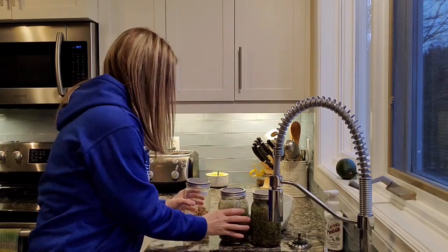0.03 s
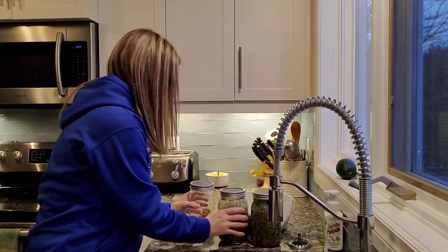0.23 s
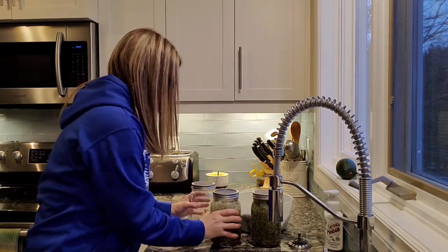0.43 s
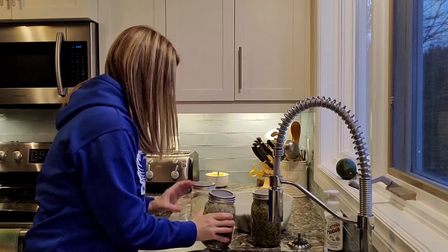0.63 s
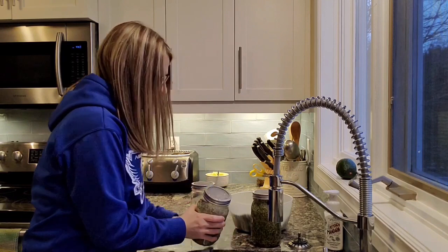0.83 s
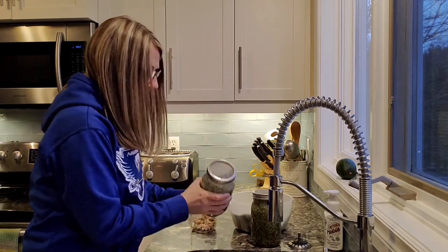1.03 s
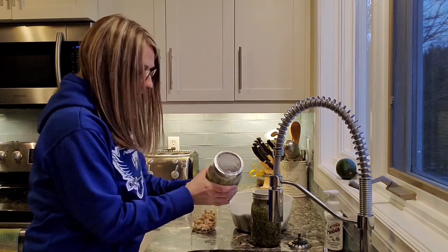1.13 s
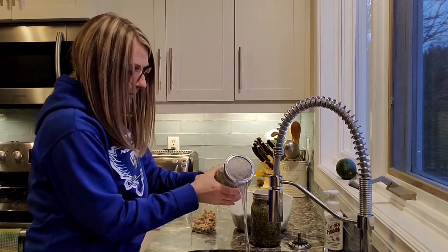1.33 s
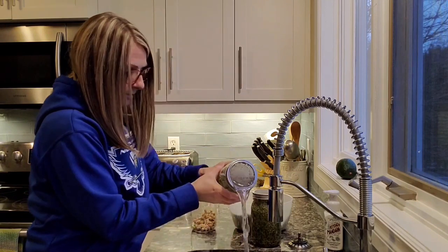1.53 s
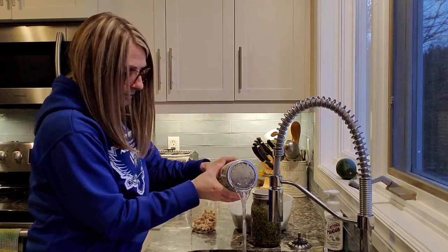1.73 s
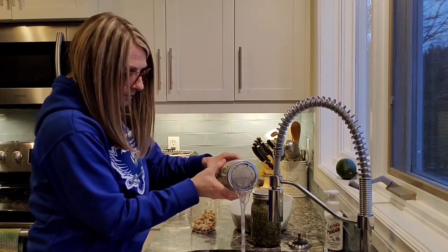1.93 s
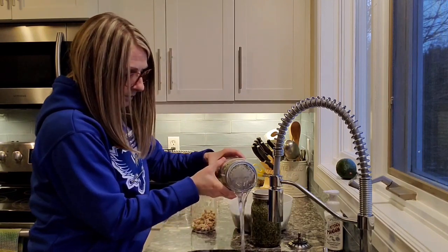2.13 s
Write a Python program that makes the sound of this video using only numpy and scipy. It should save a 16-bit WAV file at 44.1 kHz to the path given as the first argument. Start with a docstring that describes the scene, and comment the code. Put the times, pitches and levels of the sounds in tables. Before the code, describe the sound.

Water drains from a jar into a steel sink after two glass knocks on a counter.

```python
"""A hard-walled kitchen, ringing around every sound, over a low appliance hum.
A glass jar of water is bumped twice on the counter and rocks each time: clacks, a wooden-sounding boom
and ringing glass. It lifts with a small tick. Tipped over a steel sink, it fizzes faintly and drains
through its mesh lid: the stream drums the basin, patters, sprays and splashes, and one drip pings."""
import sys
import numpy as np
from scipy import signal
from scipy.fft import rfft, irfft
from scipy.io import wavfile

SR = 44100
rng = np.random.default_rng(int(sys.argv[2]) if len(sys.argv) > 2 else 0)


def materialize(psi):
    """Save the field psi as 16-bit PCM at rate SR to the path in sys.argv[1].

    A 1-D psi becomes a single channel; in a 2-D psi each row is a channel.
    """
    bounded = np.clip(np.atleast_2d(psi).T, -1, 1)
    quanta = np.round(bounded * 32767).astype(np.int16)
    wavfile.write(sys.argv[1], SR, quanta)


N = 97020


def undb(db):
    return 10 ** (np.asarray(db) / 20)


def clock():
    return np.arange(N) / SR


def unit_rms(x):
    return x / np.sqrt(np.mean(x ** 2))


def unit_energy(x):
    return x / np.sqrt(np.sum(x ** 2, axis=-1, keepdims=True))


def decay(t60):
    """Envelope that falls 60 dB in t60 seconds."""
    return np.exp(-np.minimum(np.log(1000) * clock() / t60, 40))


def convolve(x, y):
    return signal.fftconvolve(np.atleast_2d(x), np.atleast_2d(y), axes=-1)[:, :N]


def cue(start_s, x):
    return np.pad(np.atleast_2d(x), ((0, 0), (int(start_s * SR), 0)))[:, :N]


def pan(x, left_db):
    return x * undb(np.array([[1], [-1]]) * left_db / 2)


def filt(x, hz, kind, order=2):
    sos = signal.butter(order, np.minimum(hz, SR / 2 - 1), kind, fs=SR, output="sos")
    return signal.sosfilt(sos, x + 1e-18)


def eq(x, curve, size=4096):
    """Minimum-phase EQ through (f/Hz, level/dB) points."""
    hz, db = np.array(curve).T
    bin_hz = np.arange(size // 2 + 1) * SR / size
    gain = undb(np.interp(np.log(bin_hz + 1), np.log(hz), db))
    cepstrum = irfft(np.log(gain))
    cepstrum[1:size // 2] *= 2
    cepstrum[size // 2 + 1:] = 0
    return convolve(x, irfft(np.exp(rfft(cepstrum))))


def stereo_noise(wide_hz=660):
    """Diffuse noise: the bass is alike in both ears, the treble unrelated."""
    mid, side = rfft(rng.standard_normal((2, N)))
    hz = np.arange(len(mid)) * SR / N
    alike = 1 / (1 + (hz / wide_hz) ** 2) ** 2
    spread = np.array([[1], [-1]]) * side * np.sqrt((1 - alike) / 2)
    return irfft(mid * np.sqrt((1 + alike) / 2) + spread, N)


def ring(modes):
    """Ring of a struck object; neighbouring modes swing in opposite directions."""
    return sum((-1) ** k * undb(db) * np.sin(2 * np.pi * hz * clock()) * decay(t60)
               for k, (hz, db, t60) in enumerate(modes))


def impacts(per_s, scatter_db):
    """Random clicks of uneven size: the grain of drops and scuffs."""
    hits = rng.random(N) < per_s / SR
    size = undb(scatter_db * np.clip(rng.standard_normal(N), -2, 2))
    return unit_rms(hits * size * rng.choice([-1, 1], N))


def reverb(x, room, wet_db):
    return x + undb(wet_db) * convolve(x, room)


def kitchen_response(bass_t60=0.62, treble_t60=0.35, damp_hz=5040, lowest_hz=62.5, bands=9):
    """Close reflections from cupboards, and a tail whose treble dies first."""
    spectrum, tail = rfft(stereo_noise()), 0
    bin_hz = np.arange(spectrum.shape[1]) * SR / N
    octave = np.clip(np.log2((bin_hz + 1) / lowest_hz), 0, bands - 1)
    for k in range(bands):
        hz = lowest_hz * 2 ** k
        t60 = treble_t60 + (bass_t60 - treble_t60) / (1 + (hz / damp_hz) ** 2)
        band = irfft(spectrum * np.maximum(1 - abs(octave - k), 0), N)
        tail = tail + band * decay(t60)
    attack = 1 - np.exp(-clock() / 0.0019)
    early = stereo_noise() * decay(t60=0.11)
    return unit_energy(tail * attack) + undb(-0.5) * unit_energy(early * attack)


# Tone of the kitchen air: f/Hz, level/dB
AIR_EQ = [(20, -9), (45, -12), (70, 0), (130, 3.5), (210, -8), (280, 2), (400, -9.5), (520, -3.5),
          (750, -15), (1500, -23), (2800, -33), (4200, -31), (9000, -39), (14000, -47.5)]
def room_tone():
    """A steady, dark bed of air noise."""
    return undb(-52) * unit_rms(eq(stereo_noise(), AIR_EQ))


def appliance_hum(hz=58.2, hold_s=0.4, fade_db_per_s=9):
    """A low hum that holds briefly, then fades away."""
    t = clock()
    level_db = -52 - fade_db_per_s * np.maximum(t - hold_s, 0)
    return undb(level_db) * unit_rms(np.sin(2 * np.pi * hz * t))


def drip(room, start_s=1.988, hz=2860):
    """One drip pings in the basin as its bubble rings."""
    ping = np.sin(2 * np.pi * hz * clock()) * decay(t60=0.12)
    return undb(-57) * reverb(cue(start_s, ping), room, wet_db=2.5)


LANDING_S = 1.4852  # the water first hits the steel
# Force of the stream on the basin: t/s, level/dB
STREAM_FORCE = [(1.485, 0), (1.53, 1), (1.6, -3), (1.655, 0), (1.74, 0), (1.80, -9.5), (1.875, -10.5),
                (1.91, -1.5), (1.995, -7.5), (2.03, -13), (2.12, -21.5), (2.2, -10)]
def flow():
    """The surging pour: one envelope drives spray, patter and drumming."""
    t = clock()
    return undb(np.interp(t, *np.array(STREAM_FORCE).T)) * (t > LANDING_S)


def landing_ramp(attack_s):
    return np.clip((clock() - LANDING_S) / attack_s, 0, 1)


# Sizzle of fine droplets: f/Hz, level/dB
SPRAY_EQ = [(700, -17), (1500, -8.5), (2400, -6), (4000, -3), (6300, -2), (8500, 0), (12000, 1), (14500, 1)]
def spray(room):
    """The stream throws bright droplets, which surge less than the flow does."""
    droplets = flow() ** 0.62 * landing_ramp(attack_s=0.01) * impacts(per_s=1500, scatter_db=0.5)
    return undb(-57) * reverb(eq(droplets, SPRAY_EQ), room, wet_db=7.5)


def lid_fizz(room, peak_s=1.2, width_s=0.11):
    """A faint fizz, bright as the spray, swells and fades at the mesh lid as the jar tips."""
    swell = np.exp(-((clock() - peak_s) / width_s) ** 2)
    fizz = eq(swell * impacts(per_s=3000, scatter_db=8), SPRAY_EQ)
    return undb(-74.5) * reverb(fizz, room, wet_db=4)


# Dull tap of a landing drop: f/Hz, level/dB
PATTER_EQ = [(40, -24), (90, -1.5), (250, 1), (450, -3), (750, -14.5), (1200, -19), (2200, -25),
             (5000, -36.5)]
def patter(room):
    """A crowd of soft taps gives the stream its body."""
    tap = unit_energy(eq(signal.unit_impulse(N), PATTER_EQ))
    taps = convolve(flow() * impacts(per_s=900, scatter_db=4.5), tap)
    return undb(-54.5) * reverb(taps, room, wet_db=7.5)


# Modes of the steel basin: f/Hz, level/dB, t60/s
BASIN_MODES = [(81.4, -19, 0.13), (187.1, -4.5, 0.19), (204.2, -9.5, 0.15), (250.3, -7, 0.17),
               (292.6, 0, 0.26), (359, -18.5, 0.43), (405.5, -17.5, .18), (478, -20.5, 0.2),
               (591, -23.5, 0.23)]
def basin_drum(room):
    """The stream lands with a soft thump, then its drops keep the steel drumming."""
    steel = ring(BASIN_MODES)
    thump = cue(LANDING_S, filt(steel, 425, "low"))
    drops = flow() * landing_ramp(attack_s=0.052) * impacts(per_s=800, scatter_db=4)
    drumming = convolve(drops, unit_energy(steel))
    return reverb(undb(-24.5) * thump + undb(-34.5) * drumming, room, wet_db=-15)


# Splashes in the sink: t/s, level/dB, centre f/Hz, decay time/s
SPLASH_CUES = [(1.4844, -20, 7100, 0.0035), (1.489, -13, 1130, 0.0046), (1.509, -6.5, 6300, 0.0092),
               (1.523, -15, 1370, .006), (1.529, -11.5, 6760, .02), (1.61, -10, 12600, 0.0099),
               (1.698, -4.5, 12300, 0.04), (1.72, -1.5, 7600, 0.013), (1.7223, -0.5, 6220, 0.0047),
               (1.742, -5.5, 6960, .02), (1.757, -14, 6400, 0.0091), (1.907, -11, 9800, .008),
               (1.952, -25, 11000, .015), (1.958, -11.5, 10500, 0.0078), (1.9946, -10, 6000, .007),
               (2.1253, -17, 8500, .01)]
def splashes(room, attack_s=0.0011, relative_width=0.19):
    """Gushes burst into clusters of tiny bubbles, with a broad crackle on top."""
    t, mix = clock(), 0
    for start_s, db, hz, decay_s in SPLASH_CUES:
        envelope = np.exp(-t / decay_s) * (1 - np.exp(-t / attack_s))
        burst = impacts(per_s=5000, scatter_db=-2) * envelope
        edges_hz = hz * np.exp(np.array([-1, 1]) * relative_width / 2)
        bubbles = unit_energy(filt(burst, edges_hz, "band", order=1))
        crackle = unit_energy(filt(burst, 5700, "high"))
        mix = mix + undb(db) * cue(start_s, bubbles + undb(-6) * crackle)
    return undb(-14) * reverb(mix, room, wet_db=-1)


# Tone of glass scuffing the counter: f/Hz, level/dB
TICK_EQ = [(500, -6.5), (1400, 3.5), (2400, -4.5), (3100, -8), (4100, -2), (5800, -19), (7500, -5),
           (12000, -1), (14500, -5.5)]
def jar_tick(room, start_s=0.878):
    """A short bright scuff as the jar leaves the counter."""
    scuff = unit_energy(impacts(per_s=6000, scatter_db=3.5) * decay(t60=0.043))
    return undb(-23.5) * reverb(eq(cue(start_s, scuff), TICK_EQ), room, wet_db=6)


# Hits of the rocking jar: t/s, clack level/dB, clack cutoff f/Hz, boom level/dB, glass level/dB
KNOCK_CUES = [(0.2409, -1, 2130, -11.5, -2.5), (0.252, -4, 2000, -2.5, 4.5), (0.288, -8.5, 1000, -2.5, -5),
              (.304, -6.5, 1970, -6.5, -14), (0.4149, -4, 1730, -9, -12), (0.421, -7, 1740, -2, 2),
              (0.4292, -7.5, 1100, -8.5, -16), (.4505, -6.5, 700, 1, -8)]
# Tone of the jar clacking on the counter: f/Hz, level/dB
CLACK_EQ = [(40, -14.5), (100, -3.5), (220, -3), (400, 3.5), (750, 0), (1400, 0), (2100, -0.5), (3100, -9),
            (4500, -5), (5800, -17), (8000, 3), (10000, -11), (13000, 5.5)]
# Modes of the counter and cabinet: f/Hz, level/dB, t60/s
COUNTER_MODES = [(97.4, -19.5, 0.35), (185.5, -13.5, .25), (369.4, 1.5, 0.18), (457.1, 5, .21),
                 (483, -7.5, 0.21), (600, -19, .35), (618, -18, 0.23), (679, -7.5, 0.29), (805, -13.5, 0.4),
                 (918, -17, 0.26), (1044, -23.5, 0.21), (1179, -15, 0.29), (1362, -10, 0.13),
                 (1544, -13.5, 0.21), (2010, -17, 0.16)]
# Modes of the glass jar: f/Hz, level/dB, t60/s
GLASS_MODES = [(2273, -3, 0.33), (2430, -4, .3), (2834, -8.5, 0.52), (4300, -6, .15), (4394, -1.5, 0.2),
               (4460, -1, .2), (4570, -7.5, 0.18), (4710, -9.5, .16), (7000, -18, .25), (7800, -10, 0.18),
               (12950, -19, .22)]
def jar_knocks(room, thud_hz=2090):
    """Each contact thuds and chatters, sets the counter booming and rings the glass."""
    clack, boom, glass = 0, 0, 0
    counter_ring, glass_ring = ring(COUNTER_MODES), ring(GLASS_MODES)
    for start_s, clack_db, cutoff_hz, boom_db, glass_db in KNOCK_CUES:
        hit = unit_energy(rng.standard_normal(N) * decay(t60=0.008))
        thud = filt(hit, thud_hz, "low", order=4)
        chatter = filt(unit_energy(stereo_noise() * decay(t60=0.077)), 130, "high")
        contact = undb(2) * thud + undb(-0.5) * chatter
        clack = clack + undb(clack_db) * cue(start_s, filt(contact, cutoff_hz, "low"))
        boom = boom + undb(boom_db) * cue(start_s, counter_ring)
        glass = glass + undb(glass_db) * cue(start_s, glass_ring)
    return (undb(14.5) * reverb(eq(clack, CLACK_EQ), room, wet_db=0.5)
            + undb(-25.5) * reverb(filt(boom, thud_hz, "low", order=4), room, wet_db=-12.5)
            + undb(-49) * reverb(glass, room, wet_db=-2.5))


def scene():
    """Jar and water share one room; the whole mix leans a little left."""
    room = kitchen_response()
    jar = jar_knocks(room) + jar_tick(room) + lid_fizz(room)
    bed = room_tone() + appliance_hum()
    water = basin_drum(room) + patter(room) + spray(room) + splashes(room) + drip(room)
    return pan(bed + jar, left_db=2) + pan(water, left_db=2.5)


def record(dry, low_cut_hz=35.5, high_cut_hz=14400):
    """Master filters trim the rumble and steeply cut the very top."""
    high_cut = signal.ellip(10, 0.2, 80, high_cut_hz, fs=SR, output="sos")
    return signal.sosfilt(high_cut, filt(dry, low_cut_hz, "high", order=4))


dry = scene()
out = record(dry)
materialize(out)
```